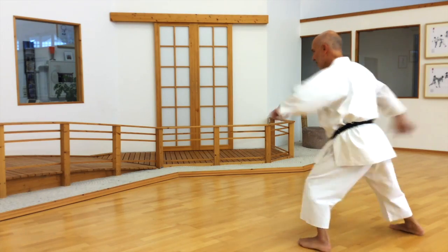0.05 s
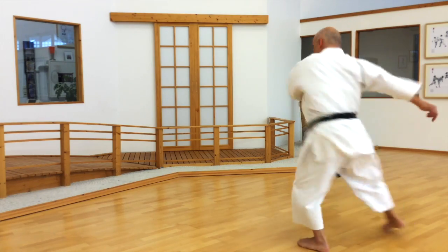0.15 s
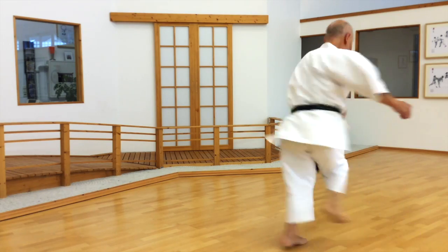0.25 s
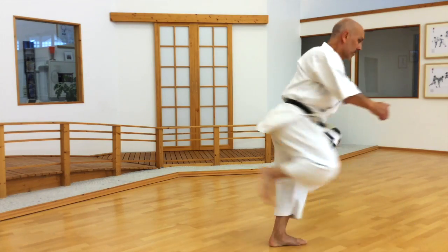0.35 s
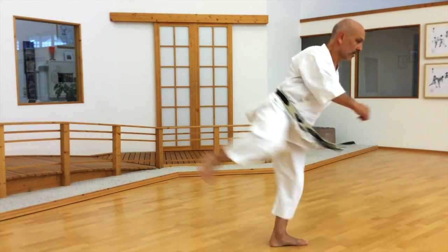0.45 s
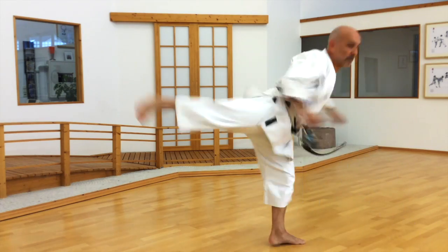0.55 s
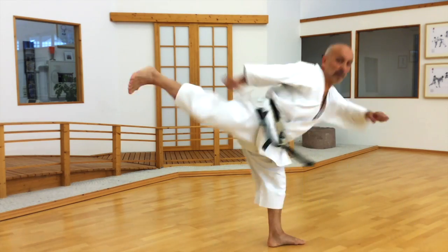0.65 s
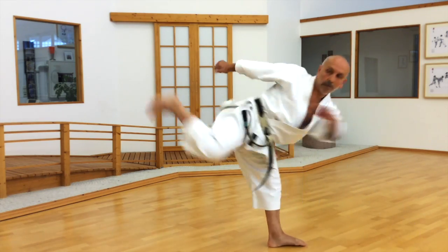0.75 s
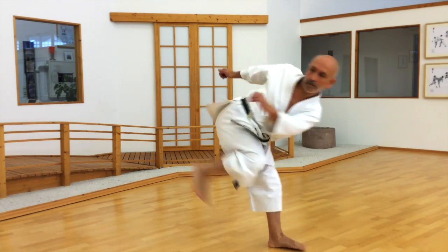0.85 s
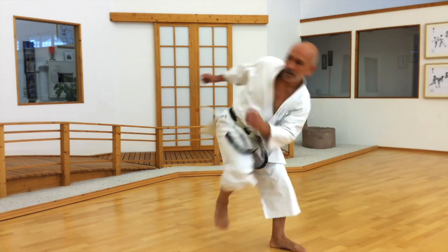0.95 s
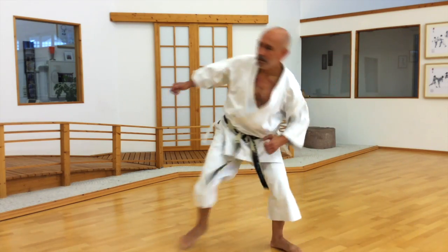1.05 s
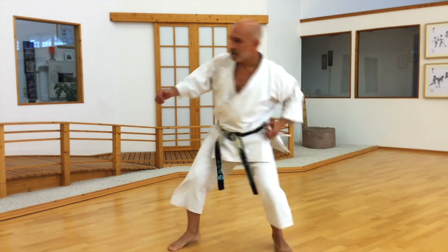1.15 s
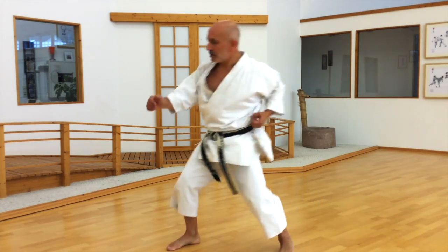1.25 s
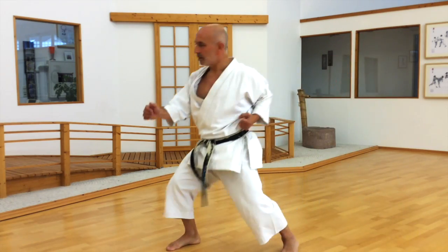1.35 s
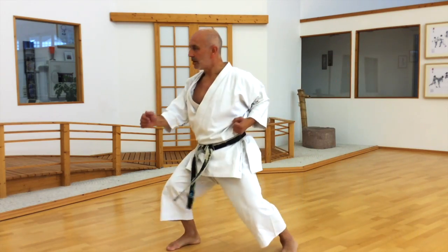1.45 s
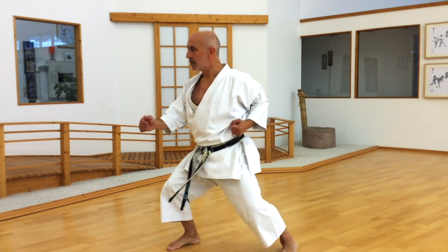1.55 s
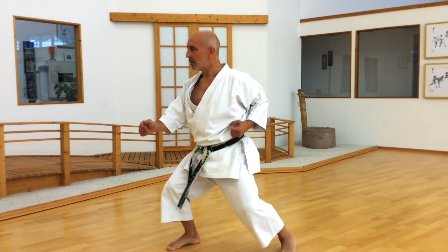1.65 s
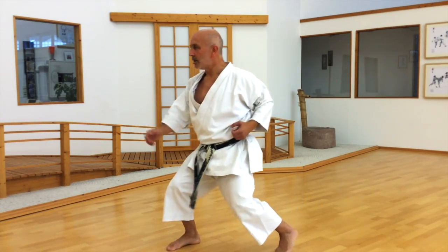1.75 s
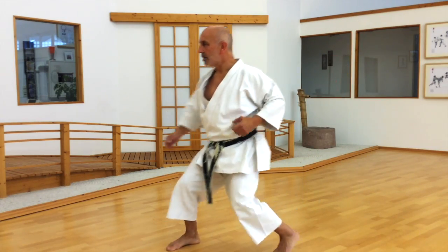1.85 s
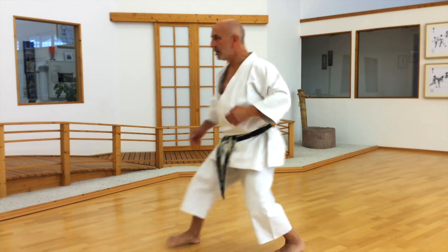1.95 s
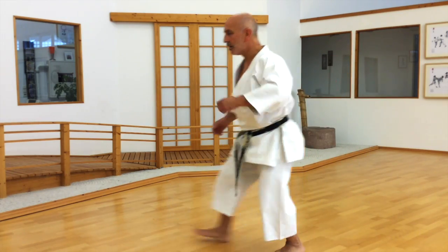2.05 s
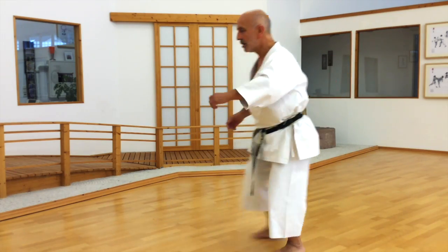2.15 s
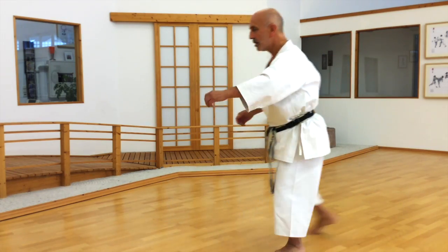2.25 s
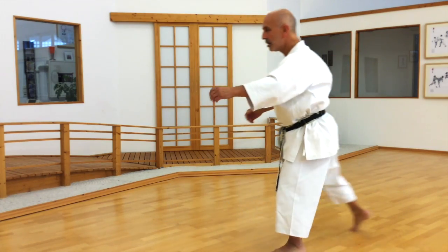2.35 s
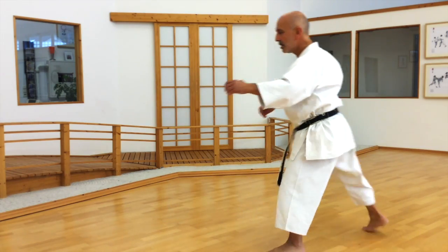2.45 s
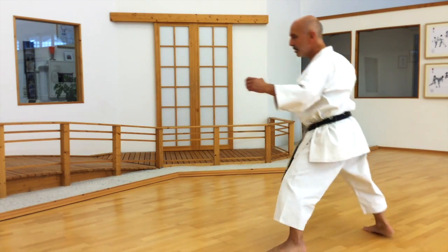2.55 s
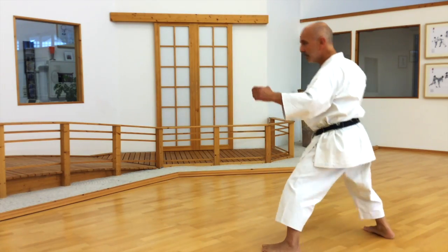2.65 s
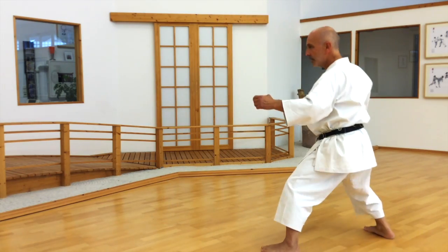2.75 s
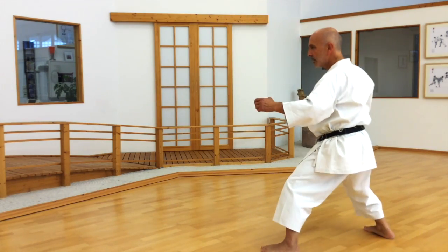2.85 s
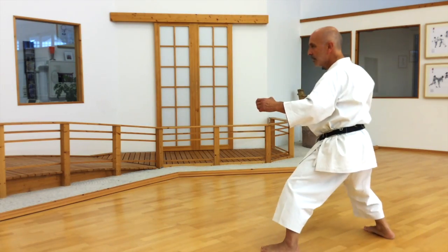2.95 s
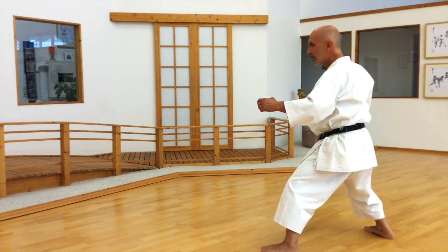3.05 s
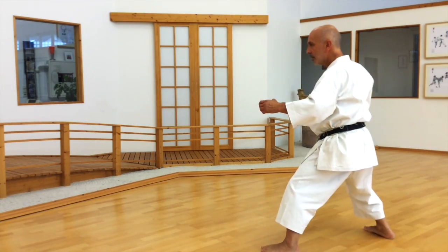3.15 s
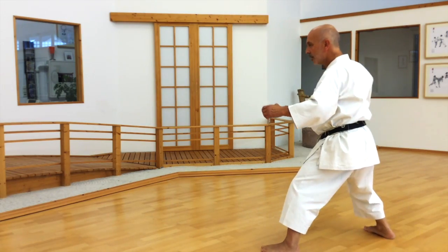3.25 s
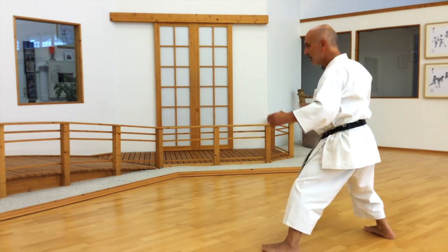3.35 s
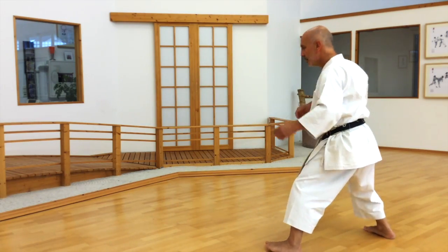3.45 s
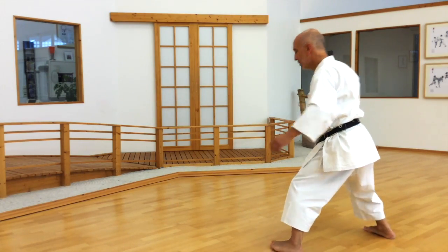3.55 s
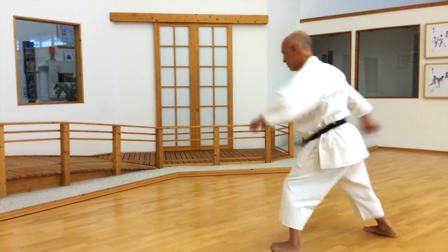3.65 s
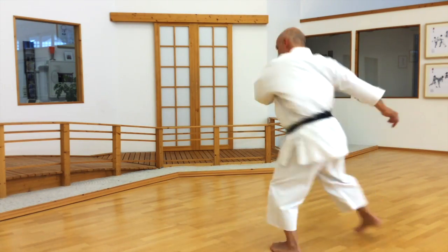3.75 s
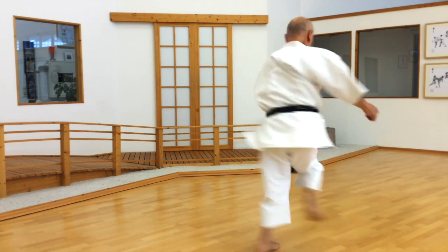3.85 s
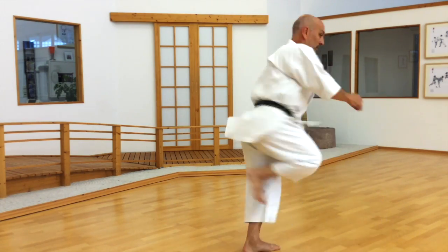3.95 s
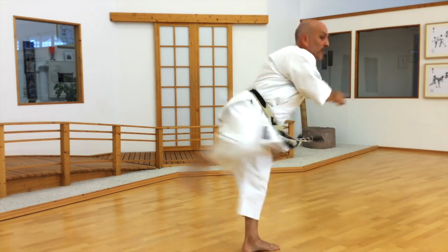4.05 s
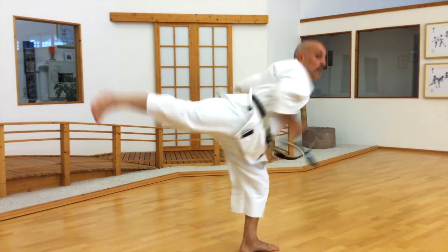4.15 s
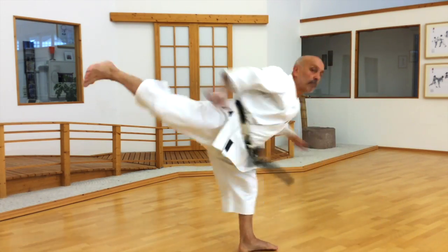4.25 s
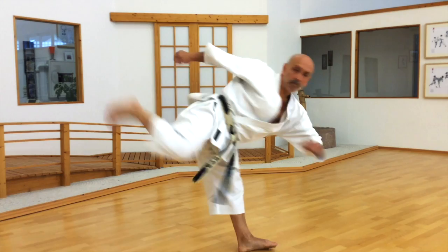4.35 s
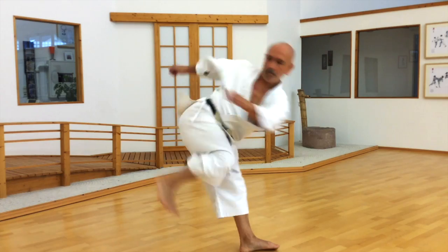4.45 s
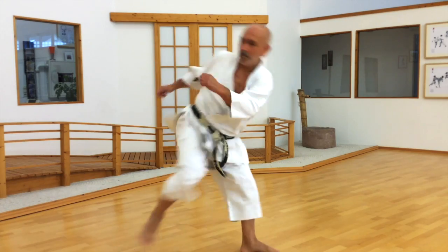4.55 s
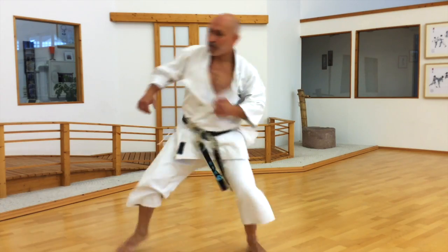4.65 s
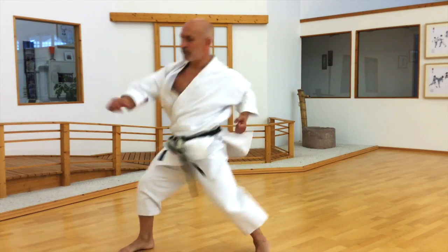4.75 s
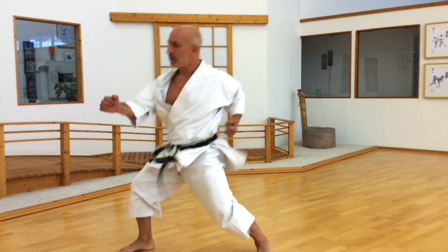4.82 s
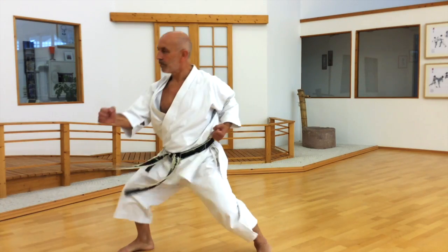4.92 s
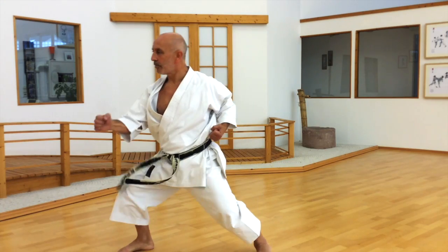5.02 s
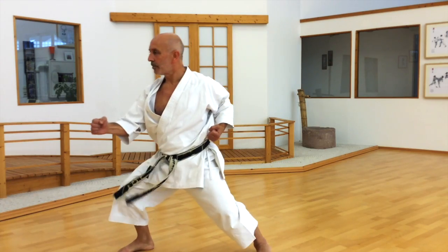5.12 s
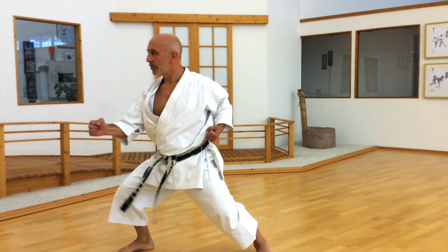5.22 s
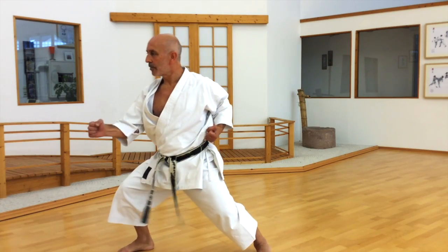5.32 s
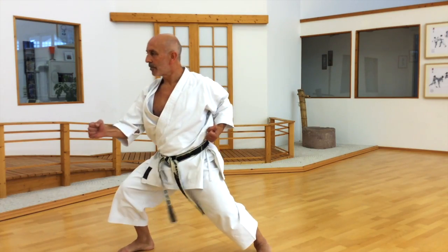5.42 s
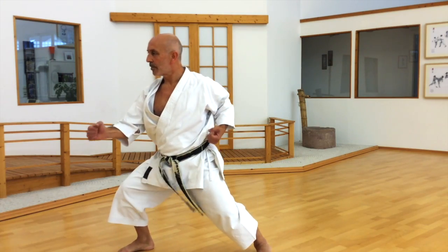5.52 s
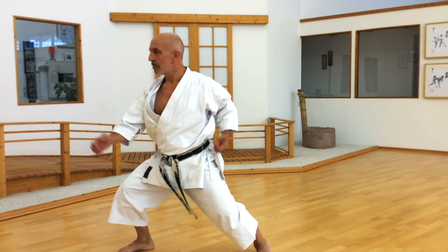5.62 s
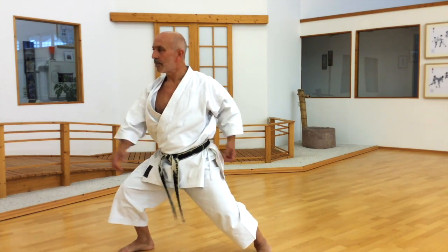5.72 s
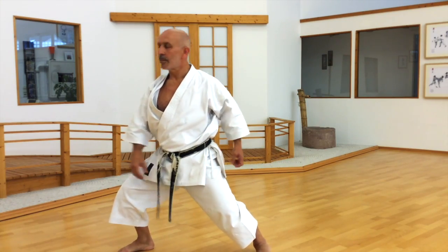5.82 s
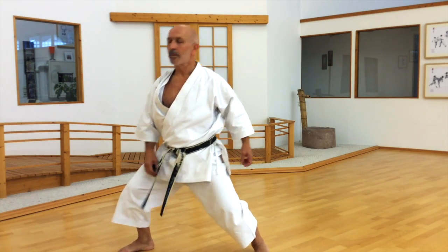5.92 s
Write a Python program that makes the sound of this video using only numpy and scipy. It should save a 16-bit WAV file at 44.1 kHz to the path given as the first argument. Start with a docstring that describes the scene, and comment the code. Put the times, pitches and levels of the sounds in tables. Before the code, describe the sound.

Bright cloth swishes and dull flapping build into a very sharp snap early on, then settle into small rustles and light ticks of fabric as the feet step back. After a quiet gap a second kick brings woody pivot rub, rapid cracks and a low foot landing. Every sound leaves a diffuse ring of about two seconds in the indoor hall, picked up in mono at some distance.

```python
"""A spinning back kick, a few steps back and a second kick, in a stiff cotton suit on a wooden floor.
Through each movement cloth rubs on cloth (bright grain noise) and loose folds flap (dull lumps) and snap taut
(a step and a crackle burst). Feet and heavy folds thud (damped sagging tones), the pivoting foot drones and
the floor rumbles (narrow and low noise). A hard-walled hall rings on after every sound, over its quiet air."""
import sys
import numpy as np
from scipy import signal
from scipy.fft import rfft, irfft, next_fast_len
from scipy.io import wavfile

SR = 44100
rng = np.random.default_rng(int(sys.argv[2]) if len(sys.argv) > 2 else 0)


def generate_wav(signal):
    """Clip the signal to [-1, 1] and save it as 16-bit WAV at the path in sys.argv[1]."""
    frames = np.transpose(np.atleast_2d(signal))
    scaled = np.clip(frames, -1, 1) * 32767
    pcm = np.round(scaled).astype(np.int16)
    wavfile.write(sys.argv[1], SR, pcm)


N = 263718

# how hard the suit moves, one table a movement (kick, steps back, kick):
# (time [s], rustle [dB], flapping [dB])
MOTION = [
    [(0, -61.5, -60), (.08, -55, -49), (.2, -46.5, -32.5), (.4, -46, -34), (.75, -42.5, -34),
     (1.0, -43.5, -35.5), (1.3, -42.5, -39), (1.5, -52.5, -43.5), (1.75, -62, -55)],
    [(1.75, -58.5, -53), (2.0, -51, -50.5), (2.2, -49, -49), (2.4, -41.5, -48.5), (2.6, -46.5, -52),
     (2.77, -50, -47), (2.85, -54, -61), (3.0, -65, -61)],
    [(3.6, -64, -69), (3.7, -52, -43), (3.8, -45, -37), (4.05, -46, -34.5), (4.35, -41.5, -34.5),
     (4.6, -44, -34.5), (4.85, -45.5, -32.5), (5.0, -46.5, -41), (5.2, -54.5, -54), (5.45, -72, -52)],
]


def from_db(db):
    """Decibels to gain."""
    return 10 ** (np.asarray(db) / 20)


def rms_one(x):
    """Scale to rms 1."""
    return x / np.sqrt(np.mean(x ** 2) + 1e-20)


def in_time(tables):
    """Gain of each dB column at every sample; each table fades in and out over 40 ms."""
    t = np.arange(N) / SR
    out = 0
    for rows in tables:
        times_s, *columns = np.transpose(rows)
        inside_s = np.minimum(t - times_s[0], times_s[-1] - t)
        fade = np.clip(inside_s / 0.04 + 0.5, 0, 1)
        out = out + fade * from_db([np.interp(t, times_s, column) for column in columns])
    return out


def bell(s, rise_s, fall_s):
    """A lopsided bell of height 1 at time s; rise and fall are its widths to 1/e."""
    t = np.arange(N) / SR - s
    return np.exp(-(t / np.where(t < 0, rise_s, fall_s)) ** 2)


def swells(rows, rise_share):
    """Sum of bells, one gain curve for each dB column of (s, length, dB, ..) rows."""
    total = 0
    for s, length_s, *db in rows:
        shape = bell(s, rise_share * length_s, (1 - rise_share) * length_s)
        total = total + from_db(db)[:, None] * shape
    return total


def at_hz(points, hz):
    """Read a (Hz, value) table on a log frequency axis."""
    table_hz, values = np.array(points).T
    return np.interp(np.log(hz), np.log(table_hz), values)


def colour(x, spectrum):
    """Give white input a spectrum; rms 1."""
    size = next_fast_len(len(x))
    hz = np.maximum(np.arange(size // 2 + 1) * SR / size, 1)
    shaped = irfft(rfft(x, size) * from_db(at_hz(spectrum, hz)), size)
    return rms_one(shaped[:len(x)])


def band(x, low_hz, high_hz):
    """Butterworth band-pass."""
    return signal.sosfilt(signal.butter(2, [low_hz, high_hz], "band", fs=SR, output="sos"), x)


def drift(rate_hz):
    """Slow chance: noise twice through a one-pole low-pass; rms 1."""
    r = np.exp(-2 * np.pi * rate_hz / SR)
    white = rng.standard_normal(N + SR)
    return rms_one(signal.lfilter([1], [1, -2 * r, r * r], white)[SR:])  # drop 1 s of settling


def grains(per_s, spread_db):
    """Random clicks of very uneven size; rms 1."""
    sizes = from_db(spread_db * np.minimum(rng.exponential(1, N), 5)) * rng.choice([-1, 1], N)
    return rms_one(sizes * (rng.random(N) < per_s / SR))


def add(out, s, sound):
    """Mix a sound in at a time."""
    at = round(s * SR)
    out[at:at + len(sound)] += sound[:N - at]


def rub():
    """Fibres catch and slip in dense grains; every stroke swells and fades over a faint rustle."""
    # strokes: (time at full speed [s], length [s], fine hiss [dB], coarse rasp [dB])
    strokes = [(.105, 0.059, -51, -43.5), (.195, 0.042, -49, -40), (.255, 0.051, -37.5, -41),
               (.313, 0.065, -29.5, -39.5), (.41, 0.037, -53, -52), (.466, .035, -49, -43),
               (.575, 0.035, -47, -39), (.624, 0.026, -43, -26.5), (.671, 0.037, -33, -28),
               (.73, 0.043, -47, -46), (.82, 0.053, -43.5, -37), (.90, 0.096, -49.5, -50),
               (1.105, 0.068, -50, -46), (1.175, 0.029, -45, -39), (1.225, 0.05, -42.5, -37),
               (1.315, .034, -59, -36), (1.834, .049, -43, -39.5), (1.965, .011, -42, -35),
               (1.995, 0.017, -48, -54), (2.018, 0.022, -49, -40.5), (2.088, 0.027, -38, -30),
               (2.125, 0.05, -31, -35), (2.18, 0.051, -40.5, -65), (2.258, 0.039, -43, -49),
               (2.285, 0.046, -42, -41), (2.34, 0.066, -48.5, -66), (2.47, 0.057, -47.5, -48),
               (2.583, 0.018, -48, -55), (2.717, 0.011, -56, -44), (3.725, .044, -44.5, -43.5),
               (3.873, 0.046, -44.5, -38), (3.925, .076, -31.5, -32.5), (3.979, 0.013, -33, -37),
               (4.12, .08, -50, -42), (4.19, 0.042, -41, -36), (4.233, 0.044, -33, -25),
               (4.28, 0.036, -44, -47), (4.475, 0.074, -45, -41), (4.545, 0.025, -48, -31),
               (4.62, 0.06, -42.5, -35.5), (4.70, 0.1, -47.5, -39), (4.755, 0.097, -37, -30.5),
               (4.835, 0.019, -45, -39), (4.90, 0.031, -45, -54), (4.95, 0.042, -55, -41)]
    # spectrum of rubbed cotton: (frequency [Hz], density [dB per Hz, relative])
    rub_colour = [(1200, -11), (1750, -15.5), (2100, -4), (2900, 4.5), (3600, -1), (4300, -4.5), (5300, -2),
                  (6500, -8.5), (9000, -12), (12500, -16.5), (16000, -27.5)]
    fine_re_rustle_db, split_hz = -7.5, 4300
    rustle = in_time(MOTION)[0] * np.array([[from_db(fine_re_rustle_db)], [1]])
    levels = rustle + swells(strokes, rise_share=0.44)
    flutter = from_db(1.8 * np.array([drift(60), drift(40)]))
    fine_level, coarse_level = levels * flutter
    fibres = colour(grains(10000, spread_db=2.0), rub_colour)
    coarse = signal.sosfiltfilt(signal.butter(2, split_hz, fs=SR, output="sos"), fibres)
    return fine_level * rms_one(fibres - coarse) + coarse_level * rms_one(coarse)


def flap():
    """Folds beat the air: dull lumps, with a crisper crackle of creases above."""
    # big folds: (time at full speed [s], length [s], dull lumps [dB], crisp creases [dB])
    folds = [(.16, 0.028, -34, -69), (.215, 0.13, -53, -56), (.325, 0.056, -34, -34),
             (.638, 0.037, -18, -25.5), (.68, 0.036, -23.5, -27.5), (.79, .08, -34.5, -48),
             (.89, 0.18, -44, -37.5), (1.187, 0.073, -40.5, -48), (1.30, 0.15, -50, -47),
             (1.84, 0.12, -73, -53), (2.40, 0.036, -70, -48), (2.485, 0.076, -68, -52),
             (3.835, 0.043, -30, -34.5), (3.91, 0.096, -29, -36.5), (4.195, 0.073, -21.5, -29),
             (4.25, 0.081, -27.5, -27.5), (4.475, 0.21, -37.5, -39), (4.767, 0.047, -36, -34.5),
             (5.095, 0.19, -46, -62), (5.137, 0.15, -44.5, -50)]
    # spectrum of the lumps: (frequency [Hz], density [dB per Hz, relative])
    flap_colour = [(80, -26), (140, -4.5), (200, -2.5), (300, -2.5), (370, -2.5), (435, 2), (510, -1.5),
                   (750, -7.5), (950, -13.5), (1300, -42.5)]
    crisp_re_dull_db = -6.5
    steady = in_time(MOTION)[1] * np.array([[1], [from_db(crisp_re_dull_db)]])
    dull_level, crisp_level = steady + swells(folds, rise_share=0.47)
    lumps = colour(grains(1500, spread_db=2.5) * from_db(2.2 * drift(25)), flap_colour)
    creases = rms_one(band(grains(2500, spread_db=3.0) * from_db(2.74 * drift(30)), 597, 1910))
    return dull_level * lumps + crisp_level * creases


def snaps():
    """Cloth pulled taut: step and crackle in a band, a longer-ringing body from its low edge up, a fizz."""
    # (time [s], crackle peak [dB], low edge [Hz], high edge [Hz], fizz re that peak [dB])
    snap_rows = [(.09, -31, 2200, 5200, -20), (.0942, -20.5, 1820, 5270, -6), (0.1645, -22, 555, 4600, -14),
                 (.206, -12.5, 473, 5600, -15), (.2456, -18, 530, 1700, -22), (.3147, -16, 634, 5500, -12),
                 (0.41, -16.5, 1270, 5300, -13), (0.562, -27, 1810, 5000, -14),
                 (0.6174, 0.2, 456, 3380, -27), (0.6457, -9, 425, 6800, -18), (0.6606, 2.7, 470, 4300, -24),
                 (.668, -13, 670, 5900, -4), (.6725, -2, 505, 4770, -13), (1.1633, -15, 2010, 3230, -12),
                 (1.312, -16, 1888, 5350, -25), (1.44, -18.5, 1650, 5800, -9),
                 (1.4662, -24, 1750, 5700, -10), (1.8316, -23.5, 2160, 5400, -17),
                 (1.9586, -25, 1920, 5770, -7), (1.9657, -22, 2216, 5600, -6),
                 (1.9879, -21, 2260, 5760, -17), (1.9981, -22, 2190, 4760, -11),
                 (2.0202, -31, 1960, 5300, -18), (2.097, -17, 1980, 5300, -8),
                 (2.4131, -15, 1860, 5300, -27), (2.464, -18.5, 2300, 5330, -17),
                 (2.555, -31, 1152, 3070, -17), (2.581, -27, 1896, 5230, -14),
                 (2.6083, -18.5, 2100, 4150, -24), (2.6753, -26.5, 1520, 3800, -15),
                 (2.7101, -33, 1864, 3700, -16), (2.831, -35, 1352, 3400, -20),
                 (3.433, -44, 1580, 3600, -9), (3.7626, -14, 690, 5750, -18),
                 (3.8184, -6.5, 424, 2040, -21), (3.9715, -10, 1750, 10200, -14),
                 (3.984, -14, 1410, 5800, -16), (4.002, -13, 610, 5050, -17), (4.104, -15, 450, 5200, -26),
                 (4.1623, -10.5, 695, 3860, -22), (4.1848, -3, 583, 4570, -28),
                 (4.2348, -1, 564, 5700, -23), (4.245, -4.5, 460, 4870, -24), (4.4549, -11, 475, 3920, -27),
                 (4.5034, -16, 1380, 4340, -22), (4.6863, -15, 480, 2800, -25),
                 (4.8421, -15, 520, 5600, -13), (4.86, -18, 2380, 4970, -8), (4.9097, -14, 2584, 5900, -25),
                 (4.973, -20, 575, 3200, -22), (5.062, -27, 1180, 3930, -14), (5.626, -59, 1070, 4940, -16),
                 (5.936, -43.5, 3700, 6240, -6)]
    step, crackle_t60_s = 2.72, 0.0077  # step re a crackle of rms 0.5 at its start
    body_re_peak_db, body_t60_s, body_octaves = -9.5, 0.02, 1.21
    out = np.zeros(N)
    t = np.arange(2048) / SR
    noises = rng.standard_normal((len(snap_rows), 2048))
    for (s, peak_db, low_hz, high_hz, fizz_db), noise in zip(snap_rows, noises):
        crackle = 0.5 * noise * from_db(-60 * t / crackle_t60_s)
        fizz = band(crackle, 7200, 14000)
        body = band(noise * from_db(-60 * t / body_t60_s), low_hz, low_hz * 2 ** body_octaves)
        crackle[0] = step
        snap = band(crackle, low_hz, high_hz)
        for part, part_db in ((snap, 0), (body, body_re_peak_db), (fizz, fizz_db)):
            add(out, s, from_db(peak_db + part_db) * part / np.abs(part).max())
    return out


def thuds():
    """Feet on boards, folds on legs: a soft push sets going a heavily damped ring that sags in pitch."""
    # (time [s], peak [dB], nominal pitch [Hz], nominal cycles to fall 20 dB, held within 1.5 to 6)
    blow_rows = [(.1514, -19.5, 440, 1.7), (.2047, -40, 640, 1.5), (.2733, -13, 285, 1.3),
                 (.2872, -11.5, 443, 2.2), (.314, -15.5, 457, 3), (.6341, -6.5, 495, 5),
                 (.6425, -14.5, 380, 3.4), (.6782, -10.5, 690, 1.7), (.7751, -14.5, 413, 2.3),
                 (1.1676, -13, 272, 1.4), (1.3375, -20.5, 470, 2.3), (2.2948, -30.5, 393, 1.7),
                 (2.4, -27.5, 420, 1.6), (2.4134, -22, 393, 1.6), (2.464, -25.5, 392, 1.9),
                 (2.6306, -29, 303, 2.3), (3.6608, -38, 447, 2), (3.6965, -33, 386, 4.7),
                 (3.7623, -21, 485, 2.6), (3.7895, -17.5, 800, 2), (3.7946, -13.5, 610, 1.2),
                 (3.7985, -13.5, 780, 1.3), (3.9033, -13, 480, 2.9), (4.1503, -16, 440, 1.9),
                 (4.1747, -7.5, 890, 2), (4.1933, -12.5, 383, 5.1), (4.2031, -8.5, 450, 2),
                 (4.212, -13, 404, 1.8), (4.217, -23, 600, 4.9), (4.3647, -18, 331, 2.6),
                 (4.3865, -18, 390, 1.4), (4.7479, -6, 282, 3.0), (4.9098, -21.5, 271, 3.1),
                 (4.9748, -20, 300, 3.2), (5.1249, -26.5, 830, 4.3), (5.8995, -36, 656, 0.96)]
    out = np.zeros(N)
    t = np.arange(4096) / SR
    for s, peak_db, hz, cycles in blow_rows:
        turns = hz * t
        push = (1 - np.exp(-turns / 0.45)) ** 2
        decay = from_db(-20 * turns / np.clip(cycles, 1.5, 6))
        phase = 0.768 * turns + 0.34 * (1 - np.exp(-turns))  # sags from 1.11 to 0.77 of nominal
        blow = push * decay * np.sin(2 * np.pi * phase)
        add(out, s, from_db(peak_db) * blow / np.abs(blow).max())
    return out


def boards(blows):
    """The blows, and the floor boards ringing on after them; deep blows excite them most."""
    # board modes: (frequency [Hz], level [dB, relative], T60 [s])
    modes = [(204.3, -1, 0.2), (228, 1, .3), (257, -7, 0.33)]
    coupling_db = -50.5
    t = np.arange(SR // 2) / SR
    ring = sum(from_db(db - 60 * t / t60_s) * np.sin(2 * np.pi * hz * t) for hz, db, t60_s in modes)
    ring = ring / np.abs(ring).max()
    return blows + from_db(coupling_db) * signal.fftconvolve(blows, ring)[:N]


def pivot():
    """Narrow woody drone of the pivoting foot: friction noise twice through one board resonance."""
    # (time at its loudest [s], length [s], level [dB])
    turns = [(.15, 0.063, -39.5), (.31, 0.13, -29), (.45, 0.093, -41), (.555, 0.12, -34.5),
             (.80, 0.23, -37), (3.91, 0.079, -27.5)]
    resonance_hz, width_hz = 443, 81  # width of a single pass
    peak = signal.iirpeak(resonance_hz, resonance_hz / width_hz, fs=SR)
    once = signal.lfilter(*peak, rng.standard_normal(N))
    drone = rms_one(signal.lfilter(*peak, once))
    return swells(turns, rise_share=0.54)[0] * drone


def boom():
    """Uneven low rumble of the sprung floor: follows the movement, swells when weight drops."""
    # weight drops: (time [s], level [dB])
    drops = [(.056, -53), (.155, -38), (.30, -43), (.655, -29.5), (1.19, -48), (1.307, -51), (1.8, -58),
             (2.08, -54), (2.3, -40.5), (2.6, -55), (3.797, -41), (4.192, -21), (4.779, -44)]
    re_flapping_db = -10
    level = from_db(re_flapping_db) * in_time(MOTION)[1]
    for s, db in drops:
        level = level + from_db(db) * bell(s, rise_s=0.013, fall_s=0.11)
    uneven = rng.standard_normal(N) * from_db(6.4 * drift(7.7))
    return level * rms_one(band(uneven, 71, 194))


def hall(x):
    """Dull wall echoes, and a diffuse tail that dies band by band."""
    # decay: (frequency [Hz], T60 [s])
    hall_t60 = [(60, 3.1), (200, 1.62), (500, 1.68), (1200, 1.85), (3000, 1.84), (5200, 1.62), (7500, 0.73),
                (11000, 0.73), (15000, 0.46)]
    # tail colour: (frequency [Hz], level [dB, relative])
    hall_colour = [(60, -0.5), (200, -3), (600, 0), (1500, 2.5), (4000, -2.5), (9000, 3), (15000, -16.5)]
    # near wall, far wall: (delay [s], level ahead of the band-pass [dB])
    wall_echoes = [(0.0315, -18), (.063, -21.5)]
    tail_db, build_s, echo_cut_hz = -11.5, 0.016, 290
    edges_hz = 22 * 2 ** np.arange(0, 9.8, 1 / 3)  # third octaves
    t = np.arange(round(2.2 * SR)) / SR
    white = rng.standard_normal((2, len(t)))
    tail = 0
    for k, (low_hz, high_hz) in enumerate(zip(edges_hz, edges_hz[1:])):
        hz = np.sqrt(low_hz * high_hz)
        decay = from_db(at_hz(hall_colour, hz) - 60 * t / at_hz(hall_t60, hz))
        tail = tail + band(white[k % 2], low_hz, high_hz) * decay  # neighbours use separate noise
    tail = tail * (1 - np.exp(-t / build_s))
    tail = from_db(tail_db) * tail / np.sqrt(np.sum(tail ** 2))
    echoes = np.zeros(len(t))
    for delay_s, db in wall_echoes:
        echoes[round(delay_s * SR)] = from_db(db)
    response = tail + band(echoes, 60, echo_cut_hz)
    return x + signal.fftconvolve(x, response)[:N]


def air():
    """Quiet air of the hall: coloured noise whose level drifts slowly."""
    # (frequency [Hz], density [dB per Hz, relative])
    air_colour = [(15, -85), (25, -26), (145, 7.5), (236, -2.5), (256, 0.5), (394, -5.5), (1190, -10.5),
                  (1890, -9.5), (2840, -11.5), (4250, -14.5), (9570, -22.5), (14800, -34), (16000, -24)]
    level_db = -58.5
    level = from_db(level_db + 1.0 * drift(0.53))
    return level * colour(rng.standard_normal(N), air_colour)


def scene():
    """Suit and feet in the hall, over its quiet air."""
    cloth = rub() + flap() + snaps()
    floor = boards(thuds()) + pivot() + boom()
    return (hall(cloth + floor) + air())[None]


def record(dry):
    """A small microphone with a slight dip near 2.9 kHz and a slight peak near 4.8 kHz; soft ceiling, top cut."""
    # dip and peak: (frequency [Hz], width [Hz], change at the centre [dB])
    dip_and_peak = [(2930, 410, -1.5), (4820, 420, 1)]
    ceiling, cutoff_hz = 1.4, 15750
    out = dry
    for hz, width_hz, db in dip_and_peak:
        around_hz = signal.iirpeak(hz, hz / width_hz, fs=SR)
        out = out + (from_db(db) - 1) * signal.lfilter(*around_hz, out)
    rounded = ceiling * np.tanh(out / ceiling)
    cut = signal.ellip(12, 0.5, 70, cutoff_hz, fs=SR, output="sos")
    return signal.sosfilt(cut, rounded)


dry = scene()
out = record(dry)
generate_wav(out)
```